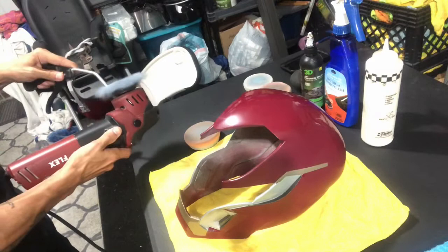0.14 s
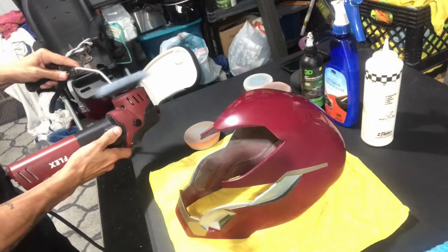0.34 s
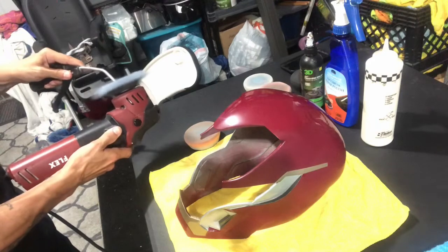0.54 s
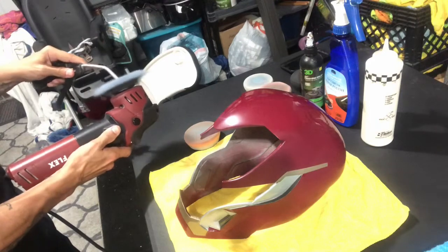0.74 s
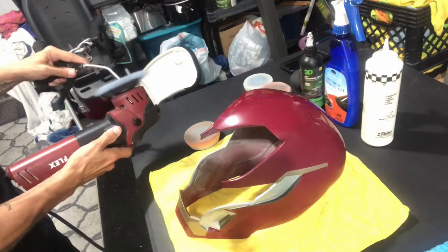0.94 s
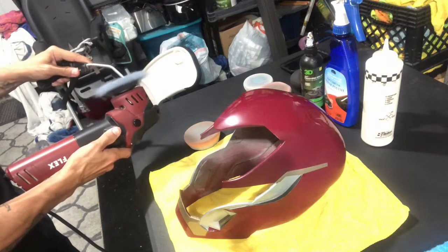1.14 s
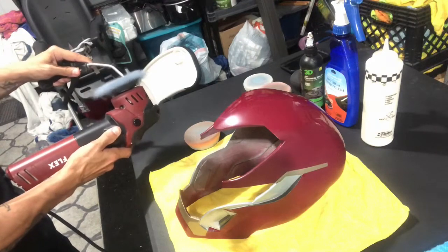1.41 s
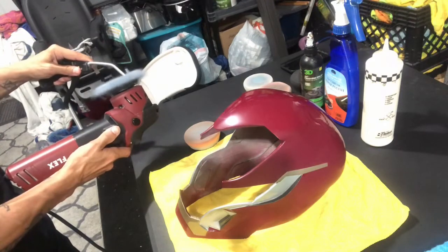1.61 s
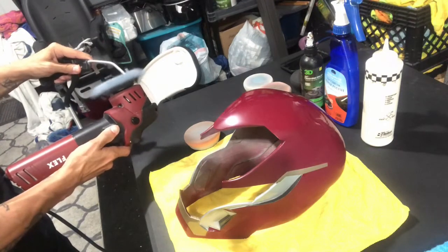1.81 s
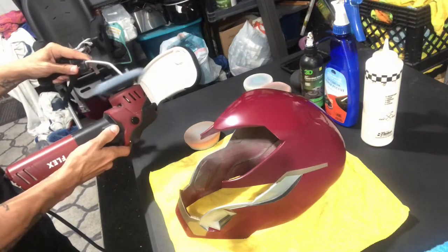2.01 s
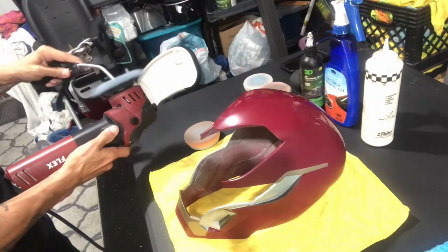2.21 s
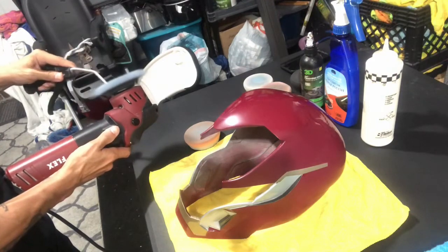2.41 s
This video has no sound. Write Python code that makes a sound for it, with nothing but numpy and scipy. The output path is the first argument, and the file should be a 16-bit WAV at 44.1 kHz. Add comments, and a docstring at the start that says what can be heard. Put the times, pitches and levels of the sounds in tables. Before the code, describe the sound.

A handheld electric polisher runs without pause, close to the microphone: a loud, bright, gritty rattle buzzing at mains rate, crowded with hard knocks, with a faint wavering motor whine and short workshop reverberation.

```python
"""A harsh rattle throbs about 120 times a second, with hard knocks, hiss, a gliding whine and a low hum.
It is a small mains-powered polisher, run free-hand in a workshop while a tool touches its spinning pad.
Random gear ticks and air noise ring the casing; short bursts of sine make the knocks.
Sines on multiples of the motor pitch make the whine; filtered noise makes the hum.
The room answers the rattle with a short tail of dying noise."""
import sys
import numpy as np
from scipy import signal
from scipy.fft import rfft, irfft
from scipy.io import wavfile
from scipy.ndimage import uniform_filter1d, minimum_filter1d

SR = 44100
rng = np.random.default_rng(int(sys.argv[2]) if len(sys.argv) > 2 else 0)


def output_pcm(signal):
    """Save a mono or channel-first signal as 16-bit PCM at the path in sys.argv[1].

    Samples are clipped to [-1, 1] before scaling.
    """
    pcm = np.clip(np.atleast_2d(signal).T, -1, 1) * 32767
    wavfile.write(sys.argv[1], SR, np.round(pcm).astype(np.int16))


N = 112454  # length in samples

FLUTTER_HZ = 147  # speed of the fast chance swings in the rattle


def rattle(phase):
    """Three pitch ranges of casing chatter share one force, bunched by the mains; knocks come on top."""
    # Course of the rattle: (time [s], level [dB], level of the treble against it [dB])
    rattle_course = [(0.02, -16, 0), (1.21, -13, -1.5), (1.36, -17, 3.5), (1.38, -13.5, 0), (1.62, -14, 1),
                     (1.7, -13.5, -0.5), (2.07, -16.5, 3), (2.41, -14, 1.5), (2.42, -17, 2.5),
                     (2.53, -14.5, 1.5)]
    # Grip of the mains pulse: (time [s], share [0-1], level of the top range against the middle one [dB])
    pulsing = [(0, 0.3, 3), (.15, 0.1, -1), (.4, 0.7, -4), (.65, 1, 2), (.9, 1, 1), (1.1, 0.8, 1.5),
               (1.4, 0.7, -1.5), (1.6, 0.9, -2), (1.9, 1, 0.5), (2.15, 1.0, -0.5), (2.4, 0.6, -1.5),
               (2.55, 0.7, -1.5)]
    # Borders between the low, middle and top range [Hz]
    borders_hz = [3500, 6700]
    pulse_db, surge_db, surge_hz, flutter_db = 5, 3, 50, 1.5

    grip, top_db = in_time(pulsing)
    force_db = pulse_db * grip * mains_pulse()
    force_db += surge_db * swing(surge_hz)
    force_db += flutter_db * swing(FLUTTER_HZ)

    hits, hush, lift = knocks()
    level_db, treble_db = in_time(rattle_course)
    ranges = []
    for hz, kind in [(borders_hz[0], "low"), (borders_hz, "band"), (borders_hz[1], "high")]:
        sos = signal.butter(6, hz, kind, fs=SR, output="sos")
        ranges.append(signal.sosfilt(sos, chatter(force_db, phase)))
    low, mid, top = ranges
    treble = amp(treble_db) * lift * (mid + amp(top_db) * top)
    return amp(level_db) * (low * hush + treble) + hits


def knocks():
    """Each hard knock is a short bell-shaped burst of sine; it hushes the low chatter and lifts the treble."""
    # Hardest knocks: (onset time [s], height of the bell around the sine [dB])
    knock_list = [(0.1181, -1), (0.2129, -1), (0.2718, -4), (0.2823, -1), (0.3032, -4), (0.3316, -2),
                  (0.3551, -3), (0.3745, -1), (0.4304, -4), (0.4549, -3), (0.4958, -4), (0.5551, -2),
                  (0.5975, -1), (0.6689, -2), (0.7647, -1), (0.7856, -2), (0.8016, -1), (0.836, -3),
                  (0.9198, -2), (0.9702, -2), (0.9936, -3), (1.0365, -1), (1.0789, -1), (1.1009, -2),
                  (1.1223, -4), (1.296, -5), (1.3708, -3), (1.3783, -2), (1.4815, -2), (1.5349, -2),
                  (1.6362, -3), (1.695, -3), (1.7524, -1), (1.7998, -3), (1.8956, -5), (1.9619, -2),
                  (1.9864, -1), (2.0038, -4), (2.0123, -2), (2.1026, -5), (2.2538, -3), (2.2757, -3),
                  (2.2937, -4), (2.3146, -5), (2.3625, -3), (2.3845, -4), (2.4698, -1), (2.5292, -4)]
    peak_delay_s, bell_s, ring_hz = 0.001505, 0.001195, 2254  # onset to middle; bell width; pitch
    hush_share, hush_s, treble_lift = 0.26, 0.011, 0.4

    t = np.arange(N) / SR
    hits, hush, lift = np.zeros(N), np.ones(N), np.ones(N)
    for s, db in knock_list:
        late = t - s - peak_delay_s
        bell = amp(db) * np.exp(-(late / bell_s) ** 2)
        hits += bell * np.sin(2 * np.pi * ring_hz * late)
        lift += treble_lift * bell
        # the low chatter dips deepest just before the middle of the knock
        hush *= 1 - hush_share * np.exp(-((late + bell_s) / hush_s) ** 2)
    return hits, hush, lift


def chatter(force_db, phase):
    """Gear ticks under a force, and air hiss chopped by the rotor, ring through the casing."""
    # Casing response to a knock, only its shape counts: (frequency [Hz], level [dB])
    casing = [(710, -57.5), (1200, -30.5), (1280, -39.5), (1520, -12), (1700, -5.5), (1930, -9.5),
              (2130, 1), (2250, -1), (2430, -2.5), (2680, -6), (2800, -15), (2990, -37), (3080, -55.5),
              (3220, -67), (3500, -35), (3700, -37), (3920, -22), (4250, -29.5), (4550, -17.5), (5200, -9),
              (5400, -13), (5580, -17), (5950, -14.5), (6200, -22), (6530, -31.5), (7200, -30), (7600, -22),
              (8100, -36), (8800, -51.5), (9200, -39.5), (9800, -38), (10200, -46.5), (11400, -59.5),
              (11900, -63), (16000, -82.5)]
    ticks_per_s, tick_spread_db, ticks_db, tick_chop = 8000, 2.4, -1.5, 0.35
    hiss_db, hiss_chop, hiss_follows = -4.5, 0.39, 0.41  # the last: share of the force swing in the hiss
    own_db, ceiling_db = 3.5, 7  # flutter of this range alone; the force levels off towards the ceiling

    size_db = tick_spread_db * np.minimum(rng.exponential(1, N), 4)
    sizes = amp(size_db) * rng.choice([-1, 1], N)
    force_db = force_db + own_db * swing(FLUTTER_HZ)
    force_db = np.where(force_db > 0, ceiling_db * np.tanh(force_db / ceiling_db), force_db)
    force = amp(force_db) * (1 + tick_chop * np.cos(phase))
    happens = rng.random(N) < ticks_per_s / SR
    ticks = amp(ticks_db) * rms_one(force * sizes * happens)
    air = rms_one(amp(hiss_follows * force_db) * rng.standard_normal(N))
    hiss = amp(hiss_db) * air * (1 + hiss_chop * np.cos(phase))
    return body(ticks + hiss, casing)


def mains_pulse():
    """A steady wave, two swings per mains cycle."""
    pulse_hz, start_rad = 120.05, -2.56
    return np.cos(2 * np.pi * pulse_hz * np.arange(N) / SR + start_rad)


def swing(rate_hz):
    """Chance swings with the slowest part weakened, so that the level stays steady on the whole."""
    steady_hz = 19  # slower swings than this even out
    sos = signal.butter(1, steady_hz, "high", fs=SR, output="sos")
    return rms_one(signal.sosfilt(sos, drift(rate_hz)))


def turns():
    """The whine's phase adds up the motor pitch, which glides with the load and jitters slightly."""
    # Motor pitch: (time [s], pitch [Hz])
    pitch_course = [(0, 532), (.1, 519), (.2, 499), (.3, 481), (.42, 472), (.55, 482), (.7, 515), (.8, 541),
                    (.9, 556), (1.0, 562), (1.12, 557), (1.25, 546), (1.4, 530), (1.55, 516), (1.7, 512.5),
                    (1.85, 514), (2.0, 526), (2.15, 538), (2.3, 540), (2.55, 540)]
    jitter_hz = 0.8
    pitch_hz = in_time(pitch_course)[0] + jitter_hz * drift(10)
    return 2 * np.pi * np.cumsum(pitch_hz) / SR


def whine(phase):
    """Wavering sines on multiples of the motor pitch; the 6th is heard through a small casing mode."""
    # Middle levels: (time [s], 1st [dB], 5th [dB], 7th multiple [dB], 6th before the small mode [dB])
    whine_levels = [(0, -40, -20.5, -55, -70), (.3, -68.5, -26.5, -75, -66), (.6, -41.5, -25, -78, -55),
                    (.85, -49, -45, -41, -51), (1.05, -48.5, -34.5, -40, -44), (1.3, -45, -35.5, -50, -52),
                    (1.4, -45, -23, -58, -56), (1.55, -39, -33, -64, -69), (1.7, -29.5, -21, -55, -45),
                    (1.85, -33, -24, -69, -46), (2.1, -37, -29.5, -49, -40), (2.2, -46.5, -30, -61, -58),
                    (2.55, -52, -34.5, -63.5, -43)]
    # Which multiples the first three levels belong to
    multiples = [1, 5, 7]
    # Rough noise in the small mode: (time [s], level [dB])
    mode_noise = [(0, -77), (.38, -80), (.45, -52.5), (.62, -48), (.72, -31), (.83, -30.5), (1.0, -36.5),
                  (1.35, -64), (1.5, -69), (1.7, -48.5), (2.1, -42), (2.3, -66), (2.55, -63)]
    mode_hz, mode_width_hz, sideband_db = 3272, 156, -5  # each mains sideband against the 6th multiple
    waver_db, top_db, top_waver_db = 3.0, -83, 5

    *levels, sixth_db = in_time(whine_levels)
    out = np.zeros(N)
    for k, db in zip(multiples, levels):
        out += np.sqrt(2) * amp(db + waver_db * drift(10)) * np.sin(k * phase)
    sixth = amp(sixth_db + waver_db * drift(10)) * np.sin(6 * phase)
    sixth *= 1 + 2 * amp(sideband_db) * mains_pulse()
    # faint, uneven 24th multiple
    out += amp(top_db + top_waver_db * drift(8)) * np.sin(24 * phase)
    rough = rms_one(resonate(rng.standard_normal(N), mode_hz, mode_width_hz))
    rough *= amp(in_time(mode_noise)[0])
    return out + resonate(sixth, mode_hz, 2 * mode_width_hz) + rough


def hum():
    """Low noise of the body, with narrow resonances that flare, a few short rings and faint air on top."""
    # Tone colour of the body, only its shape counts: (frequency [Hz], level [dB])
    hum_colour = [(24, -53.5), (45, -55.5), (60, -43), (72, -47), (150, -38.5), (265, -33.5), (356, -29),
                  (407, -21), (505, -2.5), (573, -5.5), (665, -23), (738, -19), (819, -20), (890, -7),
                  (965, -17.5), (1035, -22.5), (1100, -43.5), (1180, -10.5), (1270, -30), (1400, -15.5),
                  (1820, -10.5), (3000, -102.5)]
    # Course: (time [s], change of the hum [dB], lowest resonance [dB], highest resonance [dB])
    hum_course = [(0.03, 2, -60, -45), (0.06, -2.5, -67.5, -61), (0.6, -2, -61, -40.5),
                  (0.92, -0.5, -49, -56), (1.12, 2.5, -70, -29), (1.27, 1.5, -51.5, -38.5),
                  (1.47, -5, -59, -56.5), (1.68, 3.5, -59.5, -31.5), (1.75, 1, -56.5, -59),
                  (2.32, -0.5, -61.5, -39.5), (2.38, -4.5, -48.5, -34.5), (2.52, 4, -58, -43)]
    # Resonances with a steady mean level: (frequency [Hz], width of each filter pass [Hz], level [dB])
    steady_flares = [(896, 20.2, -42), (1029, 75, -49), (1235, 29, -64.5)]
    # Short rings: (time of the middle [s], pitch [Hz], level [dB], length between the 1/e points [s])
    ring_list = [(0.79, 1210, -26, 0.017), (0.878, 1035, -31, 0.022), (0.96, 735, -47.5, 0.27),
                 (1.236, 1183, -38, .05), (2.24, 1032, -38, 0.047)]
    hum_db, flare_db, flare_hz = -36, 3.5, 24
    low_hz, high_hz, width_hz = 263, 1359, 49  # lowest and highest resonance
    air_db, air_hz = -69.5, 11000  # noise level before only the part above air_hz is kept

    t = np.arange(N) / SR
    change_db, low_db, high_db = in_time(hum_course)
    out = amp(hum_db + change_db) * body(rng.standard_normal(N), hum_colour)
    moving_flares = [(low_hz, width_hz, low_db), (high_hz, width_hz, high_db)]
    for hz, width, db in list(steady_flares) + moving_flares:
        narrow = resonate(rng.standard_normal(N), hz, width)
        out += amp(db) * rms_one(narrow * amp(flare_db * drift(flare_hz)))
    for s, hz, db, length in ring_list:
        bell = np.exp(-(2 * (t - s) / length) ** 2)
        out += np.sqrt(2) * amp(db) * bell * np.sin(2 * np.pi * hz * t)
    sos = signal.butter(4, air_hz, "high", fs=SR, output="sos")
    return out + amp(air_db) * signal.sosfilt(sos, rng.standard_normal(N))


def room(x):
    """Many echoes blend into a tail of dying noise, the workshop's answer."""
    room_db, fall_60_db_s = -10, 0.17
    t = np.arange(SR // 2) / SR
    # the first echo comes after 4 ms
    tail = rng.standard_normal(len(t)) * amp(-60 * t / fall_60_db_s) * (t > .004)
    return amp(room_db) * signal.fftconvolve(x, tail / np.sqrt(np.sum(tail ** 2)))[:N]


def amp(db):
    """Turn decibels into a plain factor."""
    return 10 ** (np.asarray(db) / 20)


def rms_one(x):
    """Scale a signal to an average strength (RMS) of 1."""
    return x / np.sqrt(np.mean(x ** 2) + 1e-20)


def in_time(rows):
    """Join the table's points with straight lines, one curve per column after the time."""
    s, *columns = np.transpose(rows)
    return [np.interp(np.arange(N) / SR, s, c) for c in columns]


def drift(rate_hz):
    """Slow chance: noise twice through a simple low-pass, scaled to strength 1."""
    r = np.exp(-2 * np.pi * rate_hz / SR)
    noise = rng.standard_normal(N + SR)
    # the first second lets the filter settle and is dropped
    return rms_one(signal.lfilter([1], [1, -2 * r, r * r], noise)[SR:])


def resonate(x, hz, width_hz):
    """A resonance lets a narrow band through; it is applied twice, with a gain of about 1 at its peak."""
    r = np.exp(-np.pi * width_hz / SR)
    b = [(1 - r * r) / 2, 0, (r * r - 1) / 2]
    a = [1, -2 * r * np.cos(2 * np.pi * hz / SR), r * r]
    for _ in range(2):
        x = signal.lfilter(b, a, x)
    return x


def body(x, spectrum):
    """A solid body colours what strikes it and answers at once (a minimum-phase filter)."""
    size = 8192
    hz, db = np.transpose(spectrum)
    grid = np.maximum(np.arange(size // 2 + 1) * SR / size, 1)
    log_gain = np.interp(np.log(grid), np.log(hz), db) * np.log(10) / 20
    # folding the cepstrum onto its first half keeps any answer from coming too early
    cepstrum = irfft(log_gain)
    cepstrum[1:size // 2] *= 2
    cepstrum[size // 2 + 1:] = 0
    answer = irfft(np.exp(rfft(cepstrum)))
    return signal.fftconvolve(x, rms_one(answer) / np.sqrt(size))[:N]


def scene():
    """The rattle with its room tail, the whine and the hum sound together."""
    phase = turns()
    gears = rattle(phase)
    return (gears + room(gears) + whine(phase) + hum())[None]


def record(dry):
    """A smooth look-ahead limiter holds the peaks under full scale; then the top is cut."""
    limit, limit_s, cutoff_hz = 0.95, 0.004, 15100
    size = int(limit_s * SR)
    gain = np.minimum(1, limit / (np.abs(dry) + 1e-9))
    gain = minimum_filter1d(gain, size=size)
    for _ in range(2):
        gain = uniform_filter1d(gain, size=size // 2)
    sos = signal.cheby2(24, 50, cutoff_hz, fs=SR, output="sos")
    return signal.sosfilt(sos, dry * gain)


dry = scene()
out = record(dry)
output_pcm(out)
```